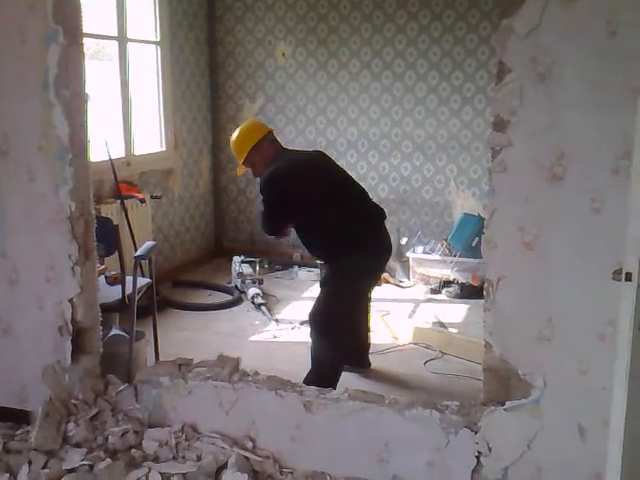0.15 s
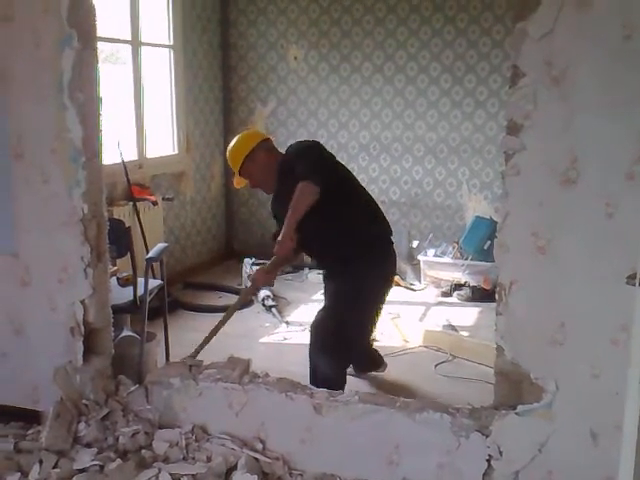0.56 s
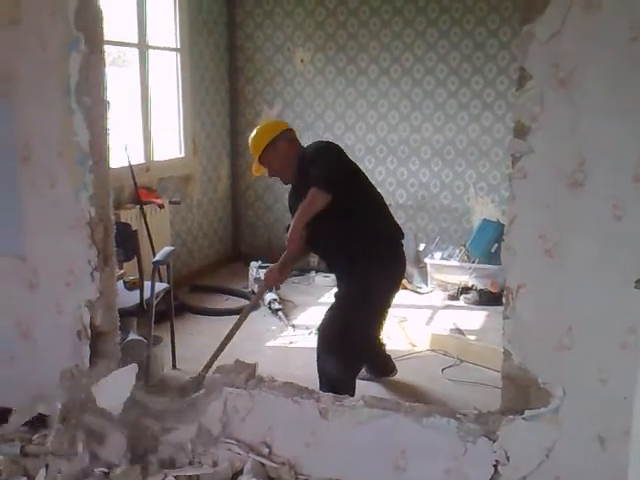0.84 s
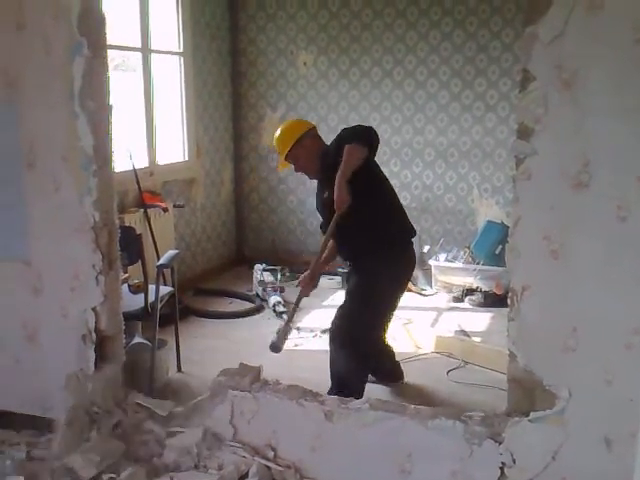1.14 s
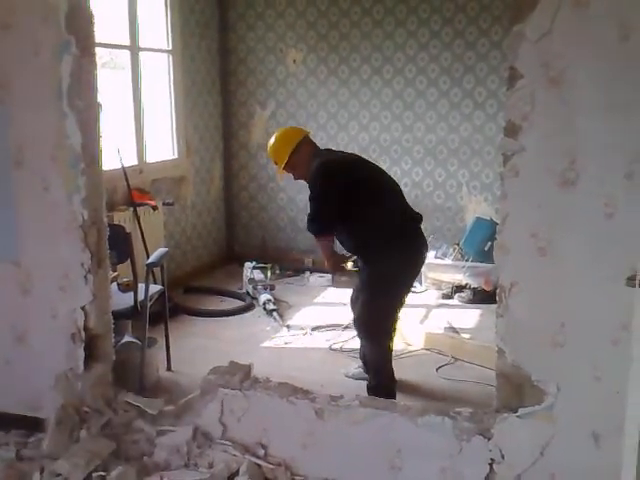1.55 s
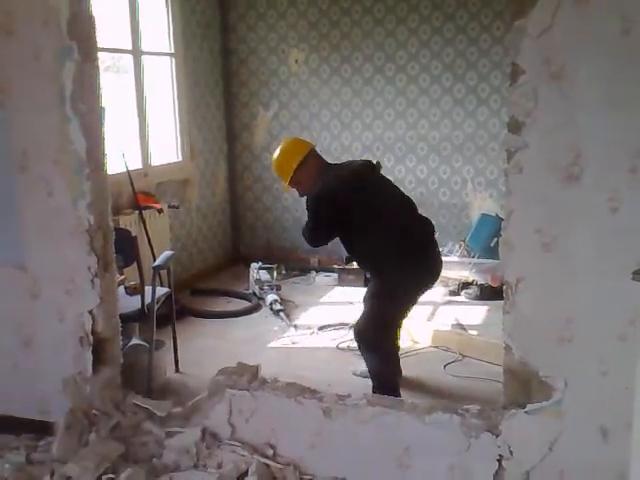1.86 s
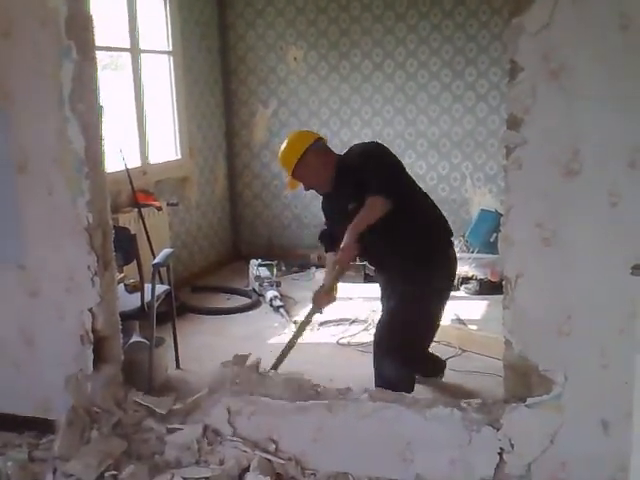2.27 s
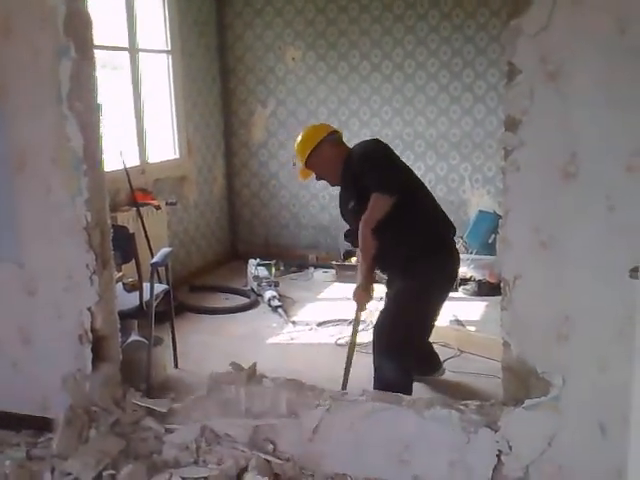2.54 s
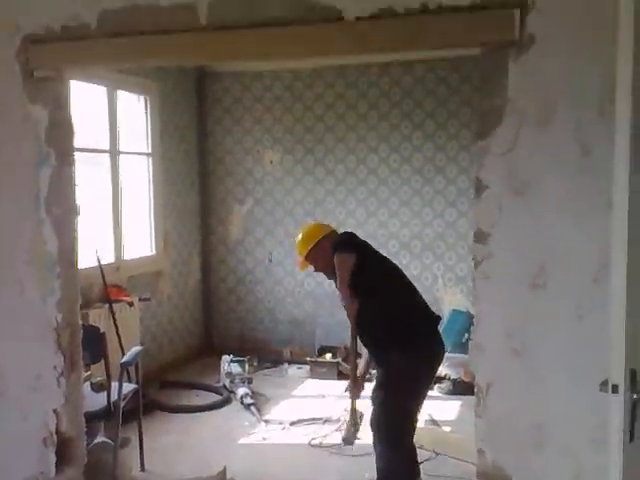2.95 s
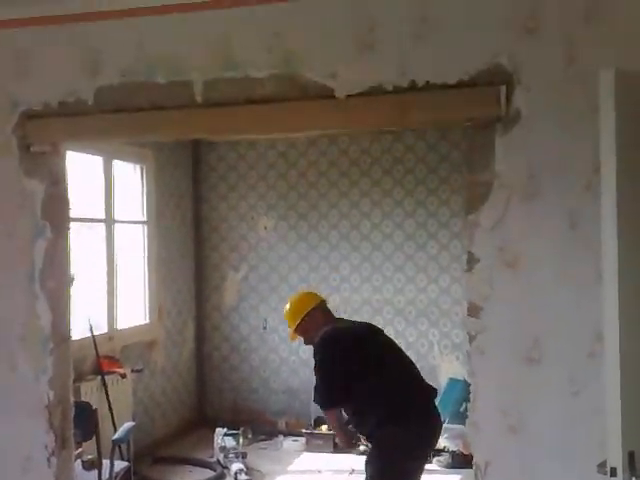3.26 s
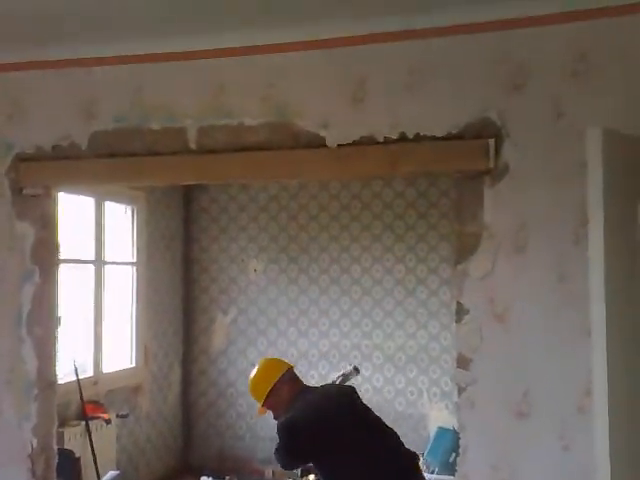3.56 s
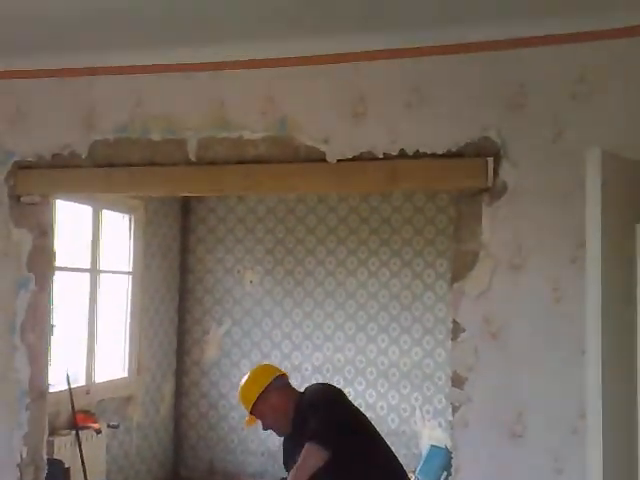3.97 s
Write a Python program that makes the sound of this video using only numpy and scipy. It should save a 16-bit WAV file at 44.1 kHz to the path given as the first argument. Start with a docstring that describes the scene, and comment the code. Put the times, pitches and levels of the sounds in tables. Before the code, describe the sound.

In a bare, echoing room a boot briefly scuffs rubble, then a sledgehammer crunches into a plastered masonry wall. Lumps knock, chips rattle and hard shards clink for about a second. A second, heavier blow brings a shorter, duller tumble. Floorboards thump softly, then a third blow lands right near the end. A small nearby microphone overloads on every hit, over faint hiss.

```python
"""Three sledgehammer blows on a low plastered wall in a bare, echoing room, each one overloading the small microphone.
Lumps, chips and grit tumble and clink on the rubble; a boot scuffs before the first blow, the floor thumps
before the last. Blows and rubble are coloured random contacts, snaps filtered noise bursts, shards decaying sines,
boards resonant noise. The room is diffuse noise dying band by band, plus standing waves."""
import sys
import numpy as np
from scipy import signal
from scipy.fft import rfft, irfft, next_fast_len
from scipy.io import wavfile

SR = 44100
rng = np.random.default_rng(int(sys.argv[2]) if len(sys.argv) > 2 else 0)


def to_linear_factor(level_db):
    """Convert decibel levels (scalar or array-like) to linear amplitude factors."""
    exponent = np.asarray(level_db, float) / 20
    return 10 ** exponent


def unload_wav(signal):
    """Save mono or channel-first audio to the path in sys.argv[1] as 16-bit WAV at rate SR, clipped to [-1, 1]."""
    wavfile.write(
        sys.argv[1],
        SR,
        np.round(np.clip(np.atleast_2d(signal).T, -1, 1) * 32767).astype(np.int16),
    )


N = 181290

# colour of masonry grit: (frequency [Hz], relative density [dB per Hz])
GRIT_COLOUR = [(4000, -38), (6500, 10.5), (9000, 9.5), (12000, 11.5), (16000, 3.5)]


def unit(x):
    """Scale to rms 1."""
    return x / np.sqrt(np.mean(x ** 2) + 1e-20)


def along(points, hz):
    """Interpolate (Hz, value) points on a log frequency axis."""
    f, v = np.transpose(points)
    return np.interp(np.log(hz + 1), np.log(f + 1), v)


def gains(rows):
    """A gain per sample for each dB column, silent outside the table."""
    s, *cols = np.transpose(rows)
    return [to_linear_factor(np.interp(np.arange(N) / SR, s, c, -150, -150)) for c in cols]


def peaks(rows, rise_db_per_s, falls_db_per_s):
    """A gain per sample for each dB column: each row swells to its time, then dies at a steady dB per second."""
    s, *cols = np.transpose(rows)
    late_s = np.arange(N) / SR - s[:, None]
    tracks = []
    for peak_db, fall_db_per_s in zip(cols, falls_db_per_s):
        drop_db = np.where(late_s < 0, -rise_db_per_s * late_s, fall_db_per_s * late_s)
        tracks.append(to_linear_factor(peak_db[:, None] - drop_db).max(axis=0))
    return tracks


def onset(t, rise_s):
    """Exponential rise from 0 towards 1."""
    return 1 - np.exp(-t / rise_s)


def sine(hz, t):
    """Steady tone of amplitude 1."""
    return np.sin(2 * np.pi * hz * t)


def filtered(x, response):
    """Apply a complex response of frequency."""
    m = next_fast_len(len(x) + 8192)
    return irfft(rfft(x, m) * response(np.fft.rfftfreq(m, 1 / SR)), m)[:len(x)]


def add(track, s, sound):
    """Mix a sound in at time s."""
    part = track[round(s * SR):][:len(sound)]
    part += sound[:len(part)]


def grains(spectrum, per_s, spread_db):
    """Contacts at random moments, some larger than the rest, coloured; rms 1."""
    draw = rng.random((3, N))
    size_db = spread_db * np.minimum(-np.log(1 - draw[1]), 3)
    size = to_linear_factor(size_db) * np.sign(draw[2] - 0.5)
    hits = size * (draw[0] < per_s / SR)
    return unit(filtered(hits, lambda hz: to_linear_factor(along(spectrum, hz))))


def chips(per_s, cycles):
    """Small fragments, each ringing at its own pitch and decaying by 1/e in the given cycles; rms 1."""
    # fragment colour: (frequency [Hz], relative level [dB])
    chip_colour = [(2300, -3), (3300, -2), (4700, 0), (6000, -4), (7000, -10)]
    draw = rng.random((int(3000 * N / SR), 4))
    draw = draw[draw[:, 3] < per_s / 3000]  # thin 3000 candidates per s
    hz, t = 2300 * 3 ** draw[:, 1:2], np.arange(400) / SR
    size = to_linear_factor(along(chip_colour, hz) + 3 * np.minimum(-np.log(1 - draw[:, 2:3]), 3))
    ring = size * np.exp(-t * hz / cycles) * sine(hz, t)
    at = (draw[:, :1] * N).astype(int) + np.arange(400)
    return unit(np.bincount(at.ravel(), ring.ravel(), N + 400)[:N])


def air():
    """Steady room tone and a faint treble hiss that fades, both shaped noise."""
    # room tone: (frequency [Hz], relative density [dB per Hz])
    tone_colour = [(30, -12), (60, -5), (120, -1), (200, -10.5), (500, -15), (1200, -18.5), (2300, -18.5),
                   (3000, -27), (5000, -26), (8000, -36), (16000, -45.5)]
    tone_db, hiss_db, hiss_fade_db_per_s = -61, -64.5, 16
    tone = filtered(rng.standard_normal(N), lambda hz: to_linear_factor(along(tone_colour, hz)))
    hiss = filtered(rng.standard_normal(N), lambda hz: hz / (hz + 5000))
    hiss_gain = to_linear_factor(hiss_db - hiss_fade_db_per_s * np.arange(N) / SR)
    return to_linear_factor(tone_db) * unit(tone) + hiss_gain * unit(hiss)


def boards():
    """Slow pushes of body weight ring the floorboard modes while dust grinds under the sole."""
    # weight shifts: (time [s], thump level [dB], grind level [dB])
    steps = [(3.595, -39.5, -50), (3.67, -45.5, -58), (3.745, -53.5, -64), (3.83, -52, -67),
             (4.05, -51.5, -58)]
    # floorboard modes: (centre [Hz], width [Hz], relative level [dB])
    modes = [(85.3, 59, -11), (139.2, 31, -1.5), (248, 12, 7.5), (330, 49, -18), (411, 66, -21)]
    # dust underfoot: (frequency [Hz], relative density [dB per Hz])
    grind_colour = [(300, -24), (500, 0.5), (1200, -5), (2200, -11), (3500, -47), (6000, -51)]
    rise_db_per_s, thump_fall_db_per_s, grind_fall_db_per_s = 700, 91, 200

    def wood(f):
        """Sum of resonances with alternating sign."""
        total = 0
        for k, (centre, width, db) in enumerate(modes):
            total = total + (-1) ** k * to_linear_factor(db) * 1j * f * width / (centre ** 2 - f * f + 1j * f * width)
        return total

    thump, grind = peaks(steps, rise_db_per_s, [thump_fall_db_per_s, grind_fall_db_per_s])
    ringing = unit(filtered(rng.standard_normal(N), wood))
    return thump * ringing + grind * grains(grind_colour, per_s=3200, spread_db=2.5)


def rubble():
    """Big pieces knock low and sparsely, small ones rattle high and densely."""
    # boot dragging through rubble: (time [s], lumps level [dB], chips level [dB])
    scuff = [(.19, -56, -66), (.24, -38.5, -47.5), (.32, -32, -55), (.38, -27, -52.5), (.44, -31.5, -49),
             (.5, -48.5, -50), (.66, -46.5, -63.5), (.79, -51, -57)]
    # masonry landing, a list after each of the first two blows:
    # (time [s], lumps level [dB], chips level [dB], grit level [dB])
    falls = [
        [(.995, -22.5, -33, -38), (1.07, -19.5, -40.5, -46.5), (1.11, -45, -34, -36.5), (1.18, -19, -24.5, -30),
         (1.225, -13.5, -37, -36), (1.285, -24, -34.5, -43.5), (1.41, -11, -30.5, -33), (1.53, -25, -41, -61),
         (1.655, -23, -40.5, -60.5), (1.74, -27, -51, -72.5), (1.89, -49.5, -57, -68.5),
         (2.01, -48.5, -65, -74), (2.19, -54, -77.5, -76), (2.3, -54, -60.5, -74), (2.38, -56.5, -65.5, -70)],
        [(2.62, -24, -53.5, -69), (2.73, -25, -45.5, -54.5), (2.8, -24, -35.5, -36), (2.86, -18, -40, -46.5),
         (2.97, -23.5, -35.5, -54.5), (3.08, -34, -52.5, -72), (3.2, -36.5, -55, -83.5),
         (3.33, -51, -61.5, -83)],
    ]
    # lump colour, a list for the scuff and each fall: (frequency [Hz], relative density [dB per Hz])
    lump_colours = [
        [(30, -29), (100, -6), (350, -1.5), (750, 3.5), (1100, -2), (1600, 0), (2300, -7.5), (2900, -22.5),
         (5000, -45.5)],
        [(30, -28.5), (80, -21), (140, 4), (330, 3.5), (650, 0.5), (1100, -1), (2200, -6.5), (2900, -24.5),
         (5000, -54.5)],
        [(30, -29.5), (80, -3.5), (140, -1), (330, 0), (650, -3.5), (1100, -7.5), (2200, -10), (2900, -31),
         (5000, -38.5)],
    ]
    # settling rates of lumps, chips, grit [dB/s]
    settle_db_per_s = [349.5, 262.5, 299]
    gather_db_per_s, scuff_grit_re_chips_db = 398.5, -7.5

    drag, rattle = gains(scuff)
    spells = [[drag, rattle, to_linear_factor(scuff_grit_re_chips_db) * rattle]]
    spells += [peaks(loads, gather_db_per_s, settle_db_per_s) for loads in falls]
    lumps = np.zeros(N)
    for spell, colour in zip(spells, lump_colours):
        lumps += spell[0] * grains(colour, per_s=700, spread_db=4.5)
    _, chip_gain, grit_gain = np.sum(spells, axis=0)
    fines = chip_gain * chips(per_s=1300, cycles=6)
    fines += grit_gain * grains(GRIT_COLOUR, per_s=4700, spread_db=1.0)
    return lumps, fines


def snaps():
    """Single pieces snap or land: short noise bursts around a pitch, smaller pieces dying sooner."""
    # pieces: (time [s], level [dB], centre [Hz], sharpness of pitch [-])
    pieces = [(0.2292, -27, 10910, 0.26), (.363, -42.5, 5490, 1.1), (0.47, -33.5, 10500, 0.8),
              (0.971, -33.5, 6590, 0.82), (0.987, -23.5, 9270, 0.82), (0.999, -22, 10700, 2),
              (1.0108, -24.5, 9200, 3.1), (1.067, -19.5, 552, 0.8), (1.1035, -39, 4200, 1.2),
              (1.1416, -25.5, 607, 1.1), (1.156, -25.5, 5070, 2.2), (1.2058, -14.5, 887, 0.6),
              (1.251, -20.5, 330, 1.2), (1.2921, -28, 6930, 0.93), (1.3603, -30, 12150, 0.66),
              (1.397, -26.5, 5900, 1), (1.4115, -11.5, 659, 2.1), (1.472, -12.5, 693, 1.7),
              (1.5514, -41, 7950, 0.57), (1.5805, -24, 611, 1.1), (1.6317, -23.5, 1463, 1.7),
              (1.699, -15, 620, 2.2), (1.781, -55, 10000, 1.1), (1.7895, -47.5, 10820, 1.3),
              (1.8, -42.5, 4290, 2), (1.99, -41, 4230, 4.5), (2.7585, -29, 7000, 0.66),
              (2.7736, -16, 490, 1.3), (2.859, -24.5, 1200, 0.95), (2.939, -32.5, 4170, 0.93),
              (2.957, -31, 4670, 1.1), (3.216, -49.5, 893, 0.85), (3.297, -54, 600, 1)]
    t60_at_1khz_s, shortening_exponent = 0.043, 0.12
    out, t = np.zeros(N), np.arange(SR // 8) / SR
    for s, db, hz, sharp in pieces:
        t60_s = t60_at_1khz_s * (1000 / hz) ** shortening_exponent
        noise = rng.standard_normal(len(t))
        burst = filtered(noise, lambda f: (1 + 1j * sharp * (f / hz - hz / (f + 1))) ** -2)
        add(out, s, to_linear_factor(db - 60 * t / t60_s) * onset(t, 0.001) * unit(burst))
    return out


def clinks():
    """Hard shards ring on one mode, a little unsteady in phase as they tumble."""
    # shards: (time [s], frequency [Hz], level [dB], t60 [s])
    shards = [(.97, 5600, -44, .07), (1.072, 2250, -29, .15), (1.066, 5590, -38, .08),
              (1.103, 2880, -28, .15), (1.105, 6600, -44, .12), (1.178, 3645, -21, .16),
              (1.182, 4860, -25, .12), (1.205, 2170, -28, .2), (1.305, 4700, -39, .1),
              (1.39, 2650, -31, .4), (1.457, 4445, -28, .2), (1.74, 2550, -39, .25), (1.782, 7300, -59, .2)]
    out, t = np.zeros(N), np.arange(SR // 4) / SR
    for s, hz, db, t60_s in shards:
        drift_rad = np.cumsum(rng.standard_normal(len(t))) * 0.015
        tone = np.sin(2 * np.pi * hz * t + drift_rad)
        add(out, s, to_linear_factor(db - 60 * t / t60_s) * onset(t, 0.0025) * tone)
    return out


def hammer():
    """Steel crushes plaster in a dying burst, grit sprays; floor shake arrives just ahead, the wall sways after."""
    # blows: (time [s], level [dB], extra bass weight [dB], extra crunch [dB], crushing time constant [s])
    strikes = [(0.796, -2.5, 4, 3.5, 0.054), (2.443, 3.5, 4.5, 2, 0.029), (4.0754, 2, 0.5, 5.5, 0.021)]
    # blow on masonry: (frequency [Hz], relative density [dB per Hz])
    thud_colour = [(30, -18), (80, -8), (160, 3.5), (330, 6.5), (700, 4.5), (1100, -1.5), (1700, -6),
                   (2600, -20.5), (4400, -23.5), (10000, -30.5), (16000, -33.5)]
    blows, near, t = np.zeros(N), np.zeros(N), np.arange(SR) / SR
    for s, db, weight_db, crunch_db, crush_s in strikes:

        def tilt(hz):
            """A squarer hit moves more wall, a glancing one breaks more plaster."""
            bass_db = weight_db / (1 + (hz / 250) ** 2)
            treble_db = crunch_db * (1 - 1 / (1 + (hz / 900) ** 2))
            return to_linear_factor(bass_db + treble_db)

        crush = filtered(grains(thud_colour, per_s=6000, spread_db=3.5)[:len(t)], tilt)
        add(blows, s, to_linear_factor(db) * crush * np.exp(-t / crush_s) * onset(t, 0.0012))
        steel_bite = to_linear_factor(db - 8 - 60 * t / 0.016) * onset(t, 0.0013) * sine(1350, t)
        add(near, s, steel_bite)
        floor_shake = to_linear_factor(db - 24 - 60 * t / 0.033) * onset(t, 0.0015) * sine(900, t)
        add(near, s - 0.003, floor_shake)
        grit = grains(GRIT_COLOUR, per_s=2400, spread_db=4.5)[:len(t)]
        add(near, s, to_linear_factor(db - 34.5 - 60 * (t / 0.24) ** 2) * onset(t, 0.0036) * grit)
        wall_sway = to_linear_factor(db - 26 - 60 * t / 0.99) * onset(t, 0.075) * sine(52, t)
        add(near, s, wall_sway)
    return blows, near


def room(x, boom_db):
    """Bare walls: each band's energy lingers as diffuse noise with its own decay; standing waves ring below."""
    # reverberation: (frequency [Hz], t60 [s])
    band_t60 = [(60, 0.64), (250, 1), (1000, 0.69), (2200, 0.91), (4500, 0.54), (8000, 0.25), (14000, 0.17)]
    # standing waves: (frequency [Hz], relative level [dB], t60 [s])
    standing = [(51.78, 0.5, 1.4), (83.8, -0.5, 0.42), (116.2, -9.5, 1.25), (146.5, -3, 0.55),
                (195, -5, 0.44), (251.7, -15.5, 0.63), (331.7, -1.5, 0.38), (421.4, -16, 0.23)]
    late = np.pad(x, (380, 0))[:N]  # diffuse sound sets in 380 samples after the direct sound
    hz, frame_s, z = signal.stft(late, SR, nperseg=512)
    keep = to_linear_factor(-120 * frame_s[1] / along(band_t60, hz))  # energy share left after one frame
    energy = (1 - keep[:, None]) * np.abs(z) ** 2
    for k in range(1, len(frame_s)):
        energy[:, k] += keep * energy[:, k - 1]
    noise = signal.stft(rng.standard_normal(N), SR, nperseg=512)[2]
    lingering = np.sqrt(energy / np.mean(np.abs(noise) ** 2)) * noise
    diffuse = signal.istft(lingering, SR, nperseg=512)[1][:N]
    t = np.arange(SR) / SR
    waves = sum(to_linear_factor(db - 60 * t / t60_s) * sine(f, t) for f, db, t60_s in standing)
    return diffuse + to_linear_factor(boom_db) * signal.fftconvolve(x, waves)[:N]


def scene():
    """Heavy sounds fill the room; small near ones are drier."""
    background, floor = air(), boards()
    lumps, fines = rubble()
    cracks, rings = snaps(), clinks()
    blows, near = hammer()
    direct = to_linear_factor(-2.5) * floor + to_linear_factor(-10.5) * lumps + to_linear_factor(-2.5) * fines
    direct += cracks + rings + to_linear_factor(-4.0) * blows + near
    sent = to_linear_factor(-3.0) * floor + to_linear_factor(-1.5) * lumps + to_linear_factor(0.5) * fines
    sent += to_linear_factor(-4.5) * cracks + to_linear_factor(-9.5) * rings + to_linear_factor(-1.0) * blows
    return (direct + room(sent, boom_db=-50.5) + background)[None]


def roll_off(x):
    """The treble ends steeply here."""
    return signal.sosfilt(signal.butter(12, 15890, fs=SR, output="sos"), x)


def record(dry):
    """The capsule thins deep bass, the input stage rounds off peaks and its output dulls the treble."""
    thin = filtered(dry[0], lambda hz: (1j * hz / (1j * hz + 35)) ** 2)
    clipped = thin / (1 + np.abs(thin / 0.76) ** 2.6) ** (1 / 2.6)
    dull = filtered(clipped, lambda hz: (hz < 15850) / (1 + 1j * hz / 9000))
    return roll_off(dull[None])


dry = scene()
out = record(dry)
unload_wav(out)
```